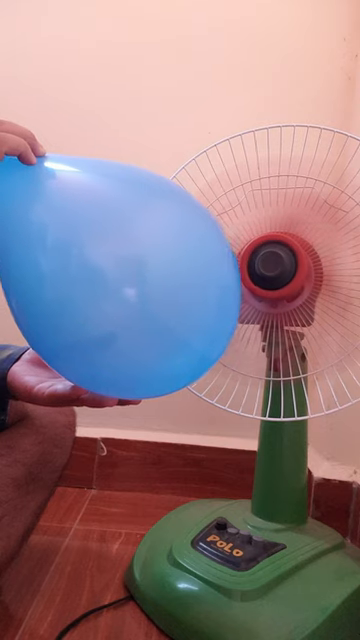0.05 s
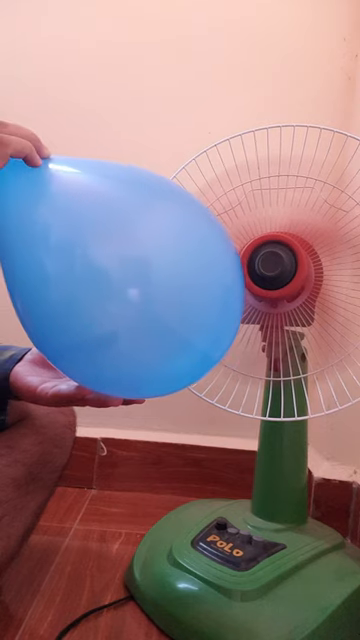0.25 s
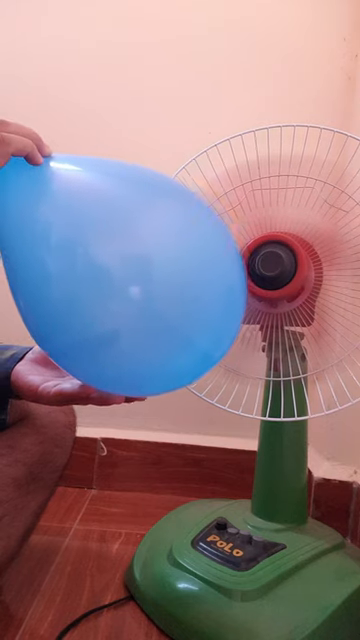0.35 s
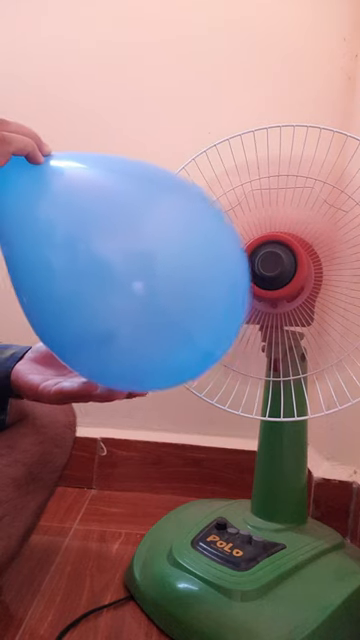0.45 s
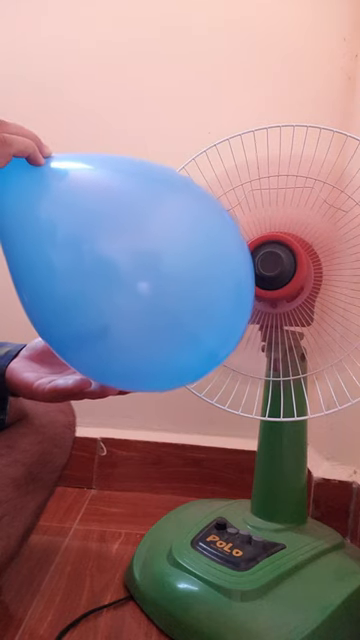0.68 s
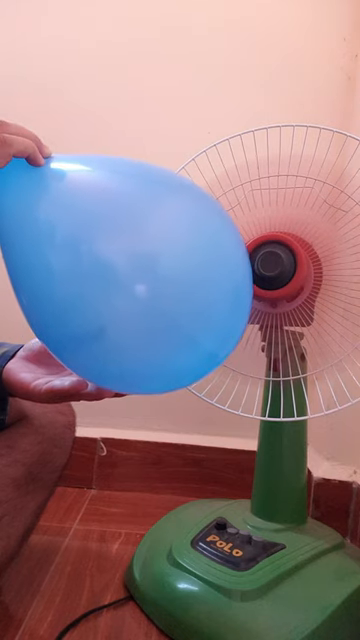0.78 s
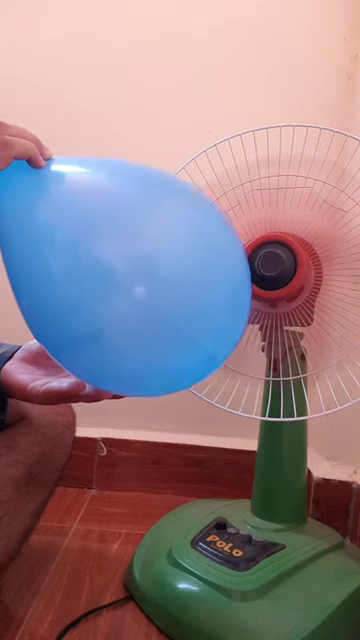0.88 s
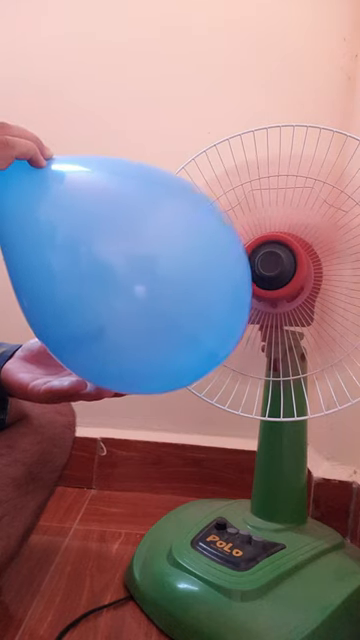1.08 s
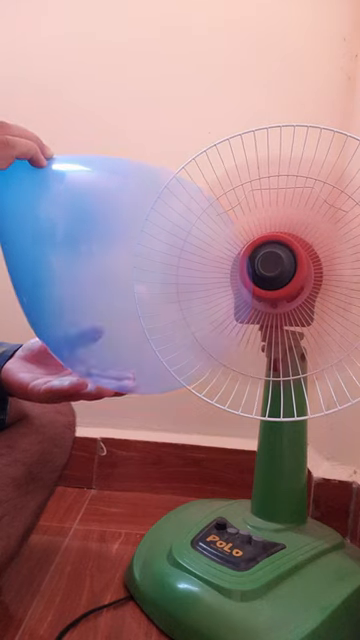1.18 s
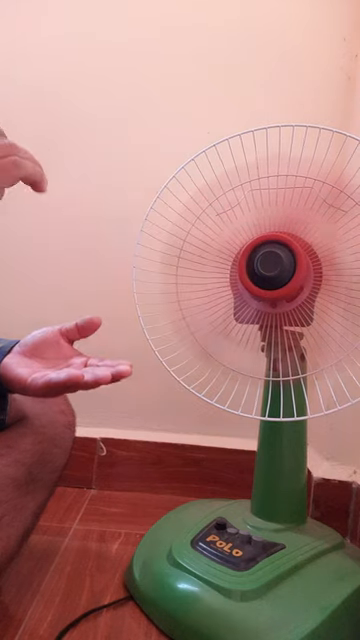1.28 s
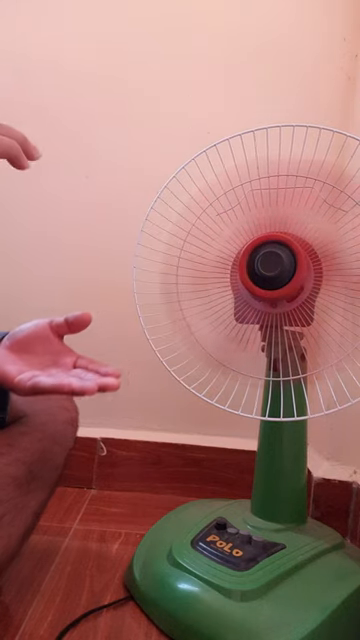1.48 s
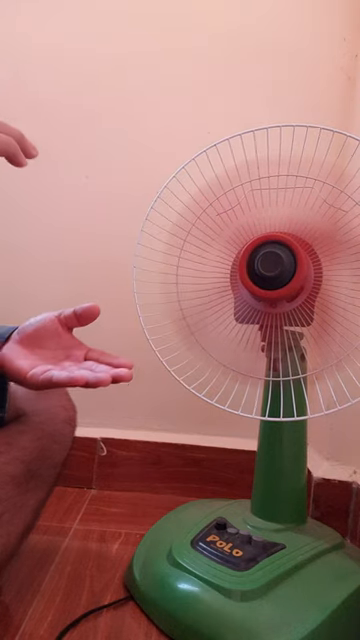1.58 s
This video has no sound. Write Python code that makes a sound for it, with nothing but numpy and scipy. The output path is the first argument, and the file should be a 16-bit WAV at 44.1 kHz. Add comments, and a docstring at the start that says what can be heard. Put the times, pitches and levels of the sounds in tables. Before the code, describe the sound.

A balloon buzzes against a table fan and pops. At first the fan hums and blows softly. At about 0.2 seconds the blades start slapping and scraping the rubber in a fast buzz, which drops in pitch until 0.7 seconds, then rises and turns hissier. At about 1.3 seconds the balloon bursts with a loud, sharp bang that rings briefly in the small room, leaving the fan sounding fainter.

```python
"""A table fan hums and blows in a small, hard room. At 0.2 s a balloon touches it lightly and is pushed in.
The blades slap and scrape the rubber so quickly that the hits blur into a buzz.
They slow under the load, then pick up again, until the skin bursts at 1.26 s.
The bang rings round the room and makes a limiter turn the volume down."""
import sys
import numpy as np
from scipy import signal
from scipy.fft import rfft, irfft
from scipy.io import wavfile
from scipy.ndimage import uniform_filter1d

SR = 44100
rng = np.random.default_rng(int(sys.argv[2]) if len(sys.argv) > 2 else 0)


def wav_out(sig):
    """Save sig, one row per channel (or a flat mono array), as 16-bit PCM at SR to the path in sys.argv[1]."""
    wavfile.write(sys.argv[1], SR, np.round(np.clip(np.atleast_2d(sig).T, -1, 1) * 32767).astype(np.int16))


N = 72765
T = np.arange(N) / SR
HZ = np.fft.rfftfreq(2 * N, 1 / SR)
FIRST_STRIKE_S, POP_S = .2548, 1.2615
# light touches before the buzz: t/s, relative slap/dB, rasp/dB, scrape/dB
TOUCHES = [(0.2011, -23, -32, -41), (0.214, -29.5, -36.5, -66), (0.2275, -42, -45, -68),
           (0.235, -38, -51, -71)]


def amp(db):
    """Turns decibels into a number to multiply by."""
    return 10 ** (np.asarray(db) / 20)


def unit(x):
    """Scales a signal to an average power of 1."""
    return x / np.sqrt(np.mean(x ** 2) + 1e-20)


def read(points, hz):
    """Reads between a table's rows, with octaves evenly spaced."""
    f, value = np.transpose(points)
    return np.interp(np.log(hz + 1), np.log(f), value)


def colour(x, db):
    """Shapes the tone with a dB curve; white noise keeps its power."""
    cepstrum = irfft(np.log(unit(amp(db))))
    cepstrum[1:N] *= 2
    cepstrum[N + 1:] = 0  # so the filter rings only after a hit
    return irfft(rfft(x, 2 * N) * np.exp(rfft(cepstrum)))[..., :N]


def convolve(x, response):
    """Lets every sample of x set off a copy of the response."""
    return irfft(rfft(x, 2 * N) * rfft(response, 2 * N))[..., :N]


def high_pass(x, hz):
    """Turns down the bass below hz."""
    return signal.sosfilt(signal.butter(2, hz, "highpass", fs=SR, output="sos"), x)


def stereo(x):
    """Makes two unrelated signals partly alike, mostly in the bass."""
    # how alike left and right are: f/Hz, likeness (1 = the same)
    likeness = [(60, 0.61), (290, 0.48), (640, 0.54), (1400, 0), (3100, 0.24), (7000, 0), (15000, 0)]
    a, b = rfft(x, 2 * N)
    same = np.clip(read(likeness, HZ), -1, 1)
    mid, side = a * np.sqrt((1 + same) / 2), b * np.sqrt((1 - same) / 2)
    return irfft(np.array([mid + side, mid - side]))[:, :N]


def noise():
    """White noise for left and right."""
    return stereo(rng.standard_normal((2, N)))


def clicks(times, sizes):
    """One click at each time."""
    samples = np.round(np.asarray(times) * SR).astype(int)
    return np.bincount(np.clip(samples, 0, N - 1), sizes, N)


def ring(modes):
    """Adds up fading tones; t60 is the time to fade by 60 dB."""
    return sum(amp(db - 60 * T / t60) * np.sin(2 * np.pi * hz * T) for hz, db, t60 in modes)


def patchy(x, patch_db):
    """Makes the tone flicker at random."""
    bands = signal.stft(x, nperseg=256)[2]
    flicker = uniform_filter1d(rng.standard_normal(bands.shape[:0:-1]), size=6, axis=0)
    flicker = uniform_filter1d(flicker, size=7, axis=1)
    return signal.istft(bands * unit(amp(patch_db * unit(flicker))).T)[1][:, :N]


def room(build_s):
    """Many tiny echoes build up and fade, the bass lasting longest."""
    # how long the room rings: f/Hz, t60/s
    decay = [(100, 0.55), (400, 0.37), (1000, 0.38), (4000, 0.35), (8000, 0.35), (15000, 0.24)]
    echoes = stereo(rng.choice([-1., 1.], (2, N)) * (rng.random((2, N)) < .15))
    hz, t, bands = signal.stft(echoes, SR, nperseg=256)
    fade = amp(-60 * t / read(decay, hz)[:, None])
    tail = signal.istft(bands * fade, SR)[1][:, :N]
    return unit(tail * (1 - np.exp(-T / build_s))) / np.sqrt(N)


def fan(air_db=-38.5):
    """The fan's rushing air and wavering hum."""
    # tone of the moving air: f/Hz, relative level/dB
    air_tone = [(30, -12.5), (64, -5), (110, -6.5), (210, -17), (320, -16), (460, -12), (740, -24),
                (1540, -30), (2750, -39.5), (6000, -44), (8500, -48), (11000, -52.5), (12500, -58),
                (16000, -61.5)]
    # tones in the hum: f/Hz, level/dB
    hum = [(66, -51.5), (76, -49), (153, -54.5), (312, -53.5), (388, -56), (463, -62.5)]
    sound = amp(air_db) * unit(colour(noise(), read(air_tone, HZ)))
    for hz, db in hum:
        waver = unit(irfft(rfft(rng.standard_normal(N)) * (HZ[::2] < 12), N))
        cycles = np.cumsum(hz * (1 + 0.007 * waver)) / SR + rng.random()
        sound += amp(db) * np.sqrt(2) * np.sin(2 * np.pi * cycles)
    return sound


def strikes():
    """The times at which a blade meets the balloon."""
    # the blades slow, then pick up: t/s, strike rate/Hz
    speed = [(0.25, 92.5), (0.38, 83.7), (0.5, 67.1), (0.66, 55.0), (0.76, 57.4), (0.92, 66.0),
             (1.05, 70.3), (1.26, 66.0)]
    count = np.cumsum(np.interp(T, *np.transpose(speed))) / SR
    count -= np.interp(FIRST_STRIKE_S, T, count)
    last = int(np.interp(POP_S, T, count))
    return np.interp(np.arange(last + 1), count, T)


def at_strikes(table, times):
    """Reads each level column of a table at the strike times."""
    t, *levels = np.transpose(table)
    return [np.interp(times, t, db) for db in levels]


def thumps(times, push_gain_db=-1.5, skin_gain_db=-2.5, uneven_db=2.42, jitter_s=0.00026,
           rebound_s=0.005964, rebound_db=-9.5):
    """Each blade shoves the balloon and slaps its skin, which bounces back and rings."""
    # how hard the blades hit: t/s, relative push/dB, swing of the lowest tone/dB, slap/dB
    contact = [(0.255, -27.5, -35, -28), (0.277, -43, -21.5, -19.5), (0.335, -25, -22.5, -29),
               (0.365, -40.5, -19.5, -23.5), (0.417, -29.5, -25.5, -23), (0.453, -19.5, -32, -17),
               (0.487, -23.5, -40, -48), (0.509, -20, -36, -18.5), (0.551, -34, -31.5, -27),
               (0.583, -18.5, -39, -27.5), (0.649, -24, -35.5, -36), (0.681, -48, -31.5, -40.5),
               (0.721, -22, -25.5, -40), (0.857, -43.5, -33, -37.5), (0.943, -30.5, -43.5, -35),
               (0.987, -34.5, -44.5, -33.5), (1.185, -25, -38.5, -28.5), (1.25, -32.5, -46.5, -31)]
    # tone of a shove on the whole balloon: f/Hz, relative level/dB
    push_tone = [(20, -21.5), (45, -9), (66, -3.5), (85, -0.5), (115, -9.5), (140, -23), (180, -27.5),
                 (300, -38), (900, -72.5)]
    # the balloon's own tones, lowest first: f/Hz, relative level/dB, t60/s
    skin_modes = [(184, 1, 0.19), (275.5, -3, 0.1), (311.5, -2, 0.074), (340.2, -1, 0.082),
                  (480, -6, 0.077), (541.6, -19, 0.12), (624, -13.5, 0.1), (758, -17.5, 0.21),
                  (1119, -20, 0.12)]
    push_db, swing_db, slap_db = at_strikes(contact, times)
    size, bounce_size, late, bounce_late = rng.standard_normal((len(times), 4)).T
    push = colour(clicks(times + 0.00079, amp(push_db + push_gain_db)), read(push_tone, HZ))
    slaps = clicks(times + jitter_s * late, amp(slap_db + uneven_db * size))
    bounce_times = times + rebound_s + 2 * jitter_s * bounce_late
    slaps += clicks(bounce_times, amp(slap_db + rebound_db + 2 * uneven_db * bounce_size))
    touch_s, touch_db = np.transpose(TOUCHES)[:2]
    slaps += clicks(touch_s + 0.00289, amp(touch_db))
    swing = convolve(clicks(times, amp(swing_db)), ring(skin_modes[:1]))
    upper_tones = ring(skin_modes[1:])
    skin = (convolve(slaps, upper_tones) + swing) / np.linalg.norm(upper_tones)
    skin = amp(skin_gain_db) * high_pass(skin, hz=130)
    reverb = convolve(amp(-9) * skin + amp(-6) * push, room(build_s=0.021))
    gap_samples = np.mean(np.diff(times)) * SR
    return np.sqrt(gap_samples) * (push + skin + reverb)


def rub(times, db, rise_s, grain_db=3):
    """Gritty noise swells and fades once per stroke; db lists the strikes, then the light touches."""
    stroke = T / rise_s * np.exp(-T / rise_s)
    stroke *= np.sqrt(np.mean(np.diff(times)) * SR / np.sum(stroke ** 2))
    starts = np.append(times, np.transpose(TOUCHES)[0]) - .001
    strokes = convolve(clicks(starts, amp(db)), stroke)
    return noise() * unit(amp(grain_db * rng.standard_normal(N))) * strokes


def scrapes(times, scrape_gain_db=2.5, rasp_gain_db=4, press_mid_s=.55, press_span_s=.56,
            dull_db_per_khz=.36):
    """Blades drag over the rubber: a low rasp, and a hiss that brightens as the balloon is pressed in."""
    # how hard the blades rub: t/s, relative rasp/dB, scrape/dB
    friction = [(0.255, -35.5, -42), (0.271, -40.5, -45), (0.299, -34.5, -49), (0.323, -36, -37.5),
                (0.331, -35, -41.5), (0.583, -35.5, -31.5), (0.637, -43, -37), (0.681, -40.5, -32.5),
                (0.811, -47, -36.5), (1.193, -35.5, -27), (1.215, -42, -26), (1.25, -46, -29.5)]
    # single blades that bite harder or lighter: t/s, extra scrape/dB
    bites = [(.255, -7), (.321, 3), (.501, 4), (.595, 5), (.666, 3), (.701, 2), (.754, 2.5), (.788, 1.5),
             (.822, -7), (.838, 3.5), (.902, -3.5), (.917, 5), (1.063, 5), (1.135, 5), (1.209, 6)]
    # ringing of the rubber and wire guard: f/Hz, width/Hz, boost at first/dB, boost pressed in/dB
    rings = [(2370, 160, 10.5, 1.5), (2570, 180, -2, -5.5), (2817, 97, 8, 7), (3185, 158, 0, 13),
             (3650, 160, 0, -1), (4070, 140, 1, 7), (4420, 230, 5, -8.5), (4716, 250, 3.5, 7),
             (6370, 150, 2.5, 5), (7160, 150, 4.5, 6.5), (10480, 760, 5, 2.5), (12340, 400, 5, 4)]
    # tones of the high scrape and the low rasp: f/Hz, relative level/dB
    scrape_tone = [(300, -23.5), (1500, -9.5), (3000, -3), (5000, -1.5), (7500, -1), (8900, -3),
                   (10500, -1), (13000, 0), (16000, 2)]
    rasp_tone = [(60, -32), (200, 12), (500, 10.5), (900, 3.5), (1500, 1), (2400, 1), (4000, -9),
                 (8000, -29), (16000, -79)]
    rasp_db, scrape_db = at_strikes(friction, times)
    scrape_db += 0.12 * rng.standard_normal(len(times))
    for t, db in bites:
        scrape_db[np.argmin(abs(times - t))] += db
    touch_rasp, touch_scrape = np.transpose(TOUCHES)[2:]
    peaks_db = sum(np.outer(db, 1 / (1 + (2 * (HZ - hz) / width) ** 2)) for hz, width, *db in rings)
    first_db, pressed_db = read(scrape_tone, HZ) + peaks_db
    press = np.clip((T - press_mid_s) / press_span_s + .5, 0, 1)
    grit = rub(times, np.append(scrape_db + scrape_gain_db, touch_scrape), rise_s=0.003)
    sound = colour(grit * (1 - press), first_db - dull_db_per_khz * HZ / 1000)
    sound += colour(grit * press, pressed_db)
    rasp = rub(times, np.append(rasp_db + rasp_gain_db, touch_rasp), rise_s=0.0033)
    sound += colour(rasp, read(rasp_tone, HZ))
    reverb = amp(-2) * convolve(sound, room(build_s=0.0046))
    return patchy(sound + reverb, patch_db=2)


def pop(gain_db=16.5, puff_hz=400, puff_t60=0.018):
    """The skin tears, the freed air swings a few times, and the room answers."""
    # tone of the bang: f/Hz, relative level/dB
    bang_tone = [(30, -16.5), (70, -2), (150, 2), (250, -6.5), (400, 11.5), (650, 13.5), (1000, 1),
                 (2000, 1.5), (3500, 3), (6000, 3.5), (8800, -6), (11000, -1.5), (13000, 1), (16000, -6.5)]
    # echoes from wall and floor: delay/s, relative level/dB
    reflections = [(.0085, -7.5), (.0125, -23), (.0225, -5.5), (.029, -1), (.040, -4.5)]
    # the room's own tones, stirred by the bang: f/Hz, relative level/dB, t60/s
    room_modes = [(63.5, -27.5, 0.78), (110.5, -31.5, .8), (171.6, -22, 0.41), (401, -33.5, 0.59),
                  (403, -17, 0.4), (480.5, -25, 0.52), (594, -29, 0.52), (770, -15.5, 0.21)]
    tone_db = read(bang_tone, HZ)
    crack = np.minimum(T / .0005, 1) * np.exp(-(T / .0035) ** 2 / 2)
    tear = amp(-3) * colour(noise() * crack, tone_db)
    puff = ring([(puff_hz, -3, puff_t60)]) * (1 - np.exp(-T / 0.0019))
    delay, db = np.transpose(reflections)
    echoes = np.array([clicks(delay + rng.uniform(-0.00046, 0.00057, len(db)), amp(db))
                       for _ in range(2)])  # each ear gets its own timing
    tail = amp(-11) * np.sqrt(0.053 * SR) * colour(room(build_s=0.004), tone_db)
    bang = tear + puff + convolve(tear, echoes) + patchy(tail, patch_db=1.5) + ring(room_modes)
    return amp(gain_db) * convolve(bang, clicks([POP_S], [1.]))


def scene():
    """The fan, the buzzing balloon and the burst."""
    times = strikes()
    return fan() + thumps(times) + scrapes(times) + pop()


def record(dry, limit_db=-9, recover_db_per_s=10, ahead_s=0.0023, low_cut_hz=18, top_hz=15950):
    """A limiter dips just before a loud peak and recovers slowly; peaks clip and the top treble is cut."""
    power = uniform_filter1d((dry ** 2).mean(0), size=260)
    power_db = 10 * np.log10(abs(power) + 1e-12)
    recovery_db = T * recover_db_per_s
    held_db = np.maximum.accumulate(power_db + recovery_db) - recovery_db
    over_db = np.maximum(held_db - limit_db, 0)
    dip_db = uniform_filter1d(np.interp(T + ahead_s, T, over_db), size=260)
    clipped = np.clip(high_pass(dry, low_cut_hz) * amp(-dip_db), -1, 1)
    treble_cut = signal.firwin(401, top_hz, window=("kaiser", 7), fs=SR)
    return signal.oaconvolve(clipped, treble_cut[None], "same")


dry = scene()
out = record(dry)
wav_out(out)
```